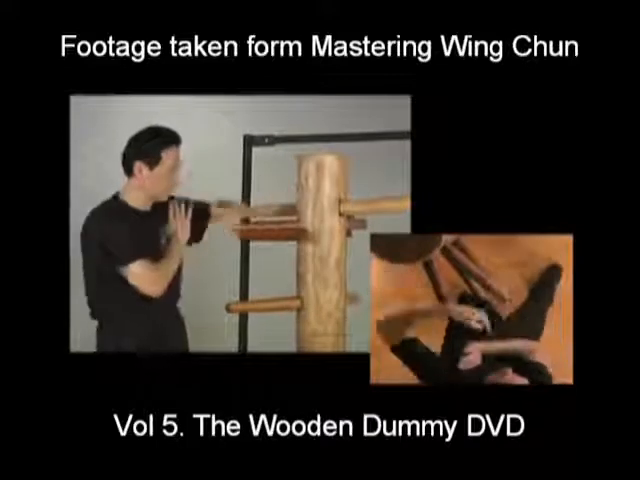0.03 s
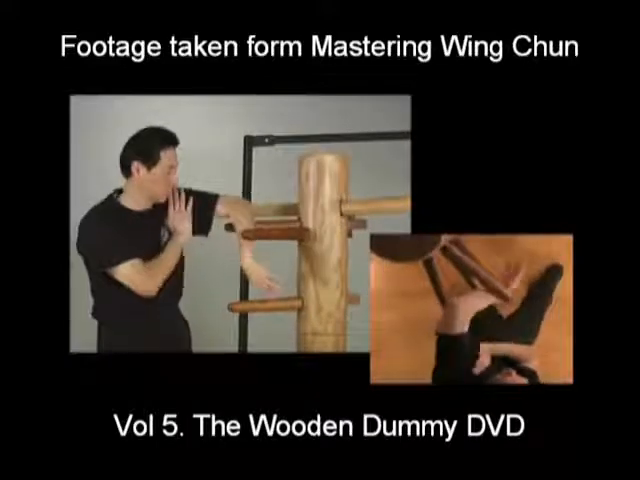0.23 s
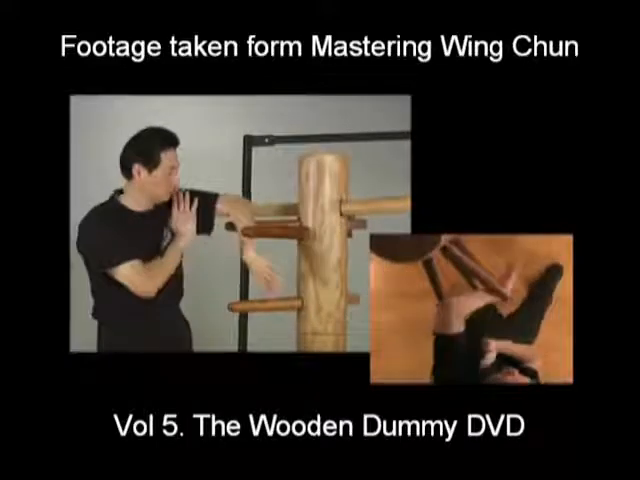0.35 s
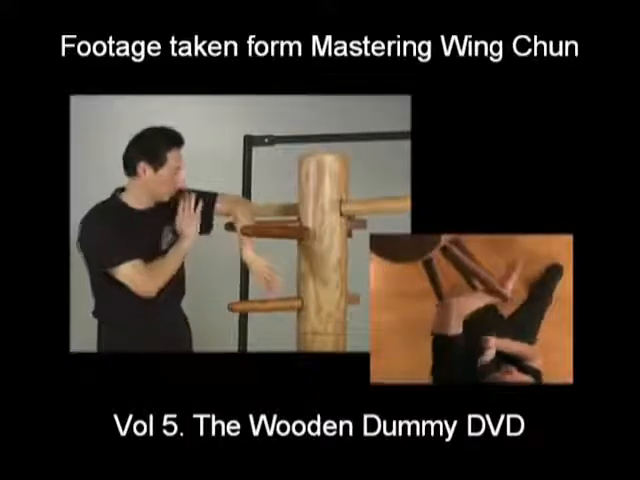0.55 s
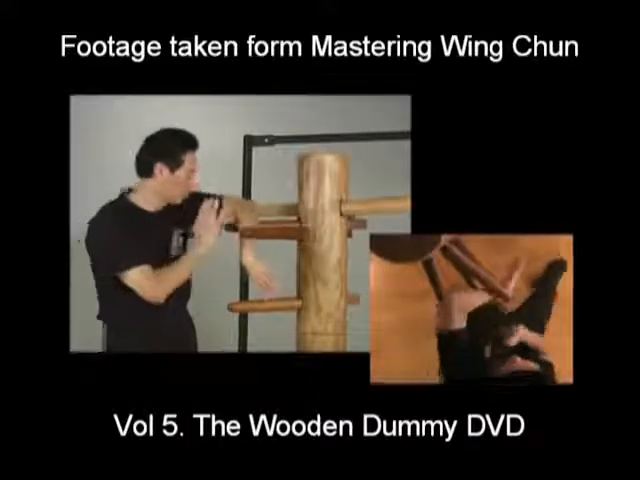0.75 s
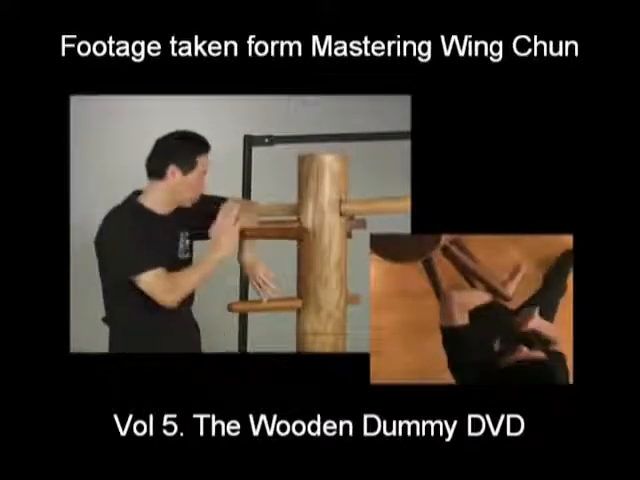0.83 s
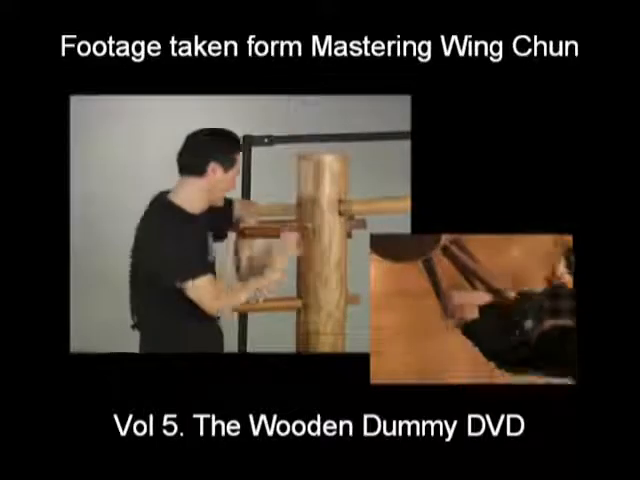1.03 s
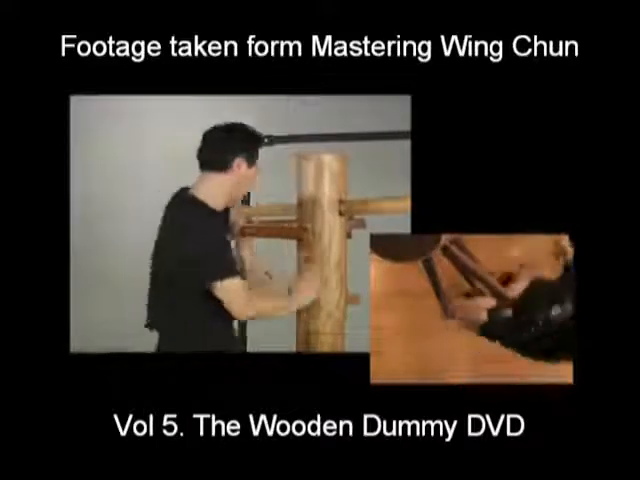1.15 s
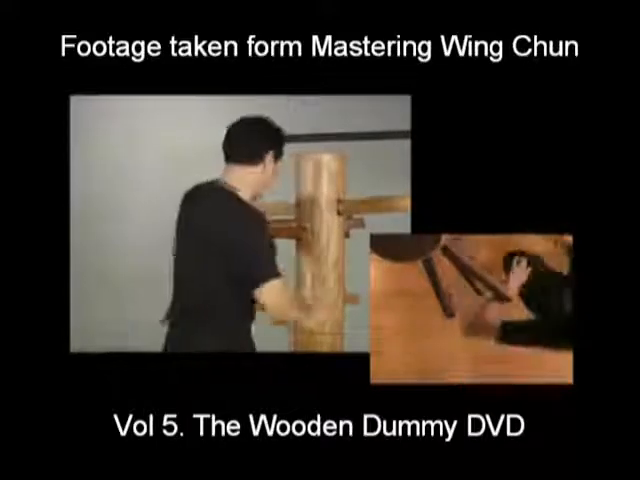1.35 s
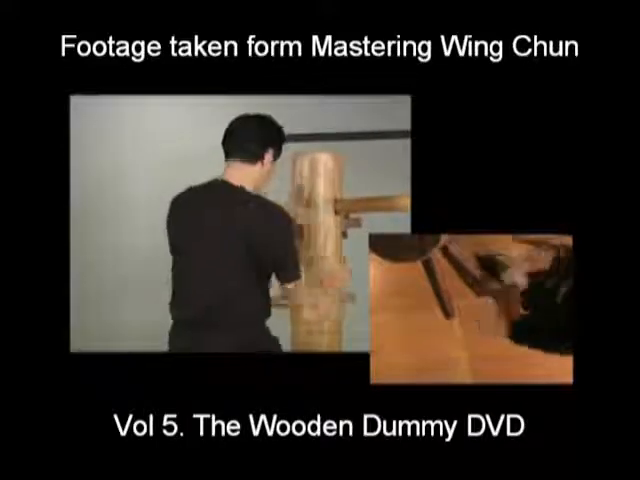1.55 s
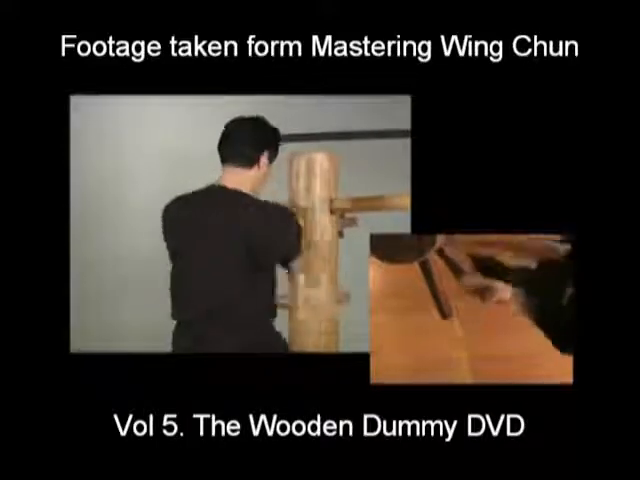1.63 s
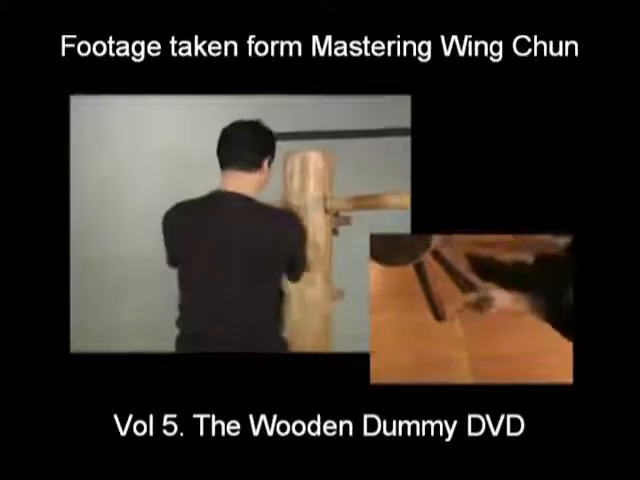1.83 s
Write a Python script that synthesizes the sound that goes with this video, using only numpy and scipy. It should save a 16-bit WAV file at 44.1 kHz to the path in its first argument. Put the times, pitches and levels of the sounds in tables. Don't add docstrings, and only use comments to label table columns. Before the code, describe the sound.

Forearms strike a wooden training dummy: one loud clattering knock early, a lull with a light slap, cloth brush and shoe squeaks, then a denser burst of knocks and thuds, close in a bare, echoing room with hiss.

```python
import sys
import numpy as np
from scipy import signal
from scipy.fft import rfft, irfft, next_fast_len
from scipy.io import wavfile
from scipy.ndimage import uniform_filter1d

SR = 44100
rng = np.random.default_rng(int(sys.argv[2]) if len(sys.argv) > 2 else 0)


def magnitude_from_level(level_db):
    exponent = np.asarray(level_db, float) / 20
    return 10 ** exponent


def wrap_up_sound(samples):
    columns = np.atleast_2d(samples).T
    tamed = np.clip(columns, -1, 1)
    steps = np.round(tamed * 32767).astype(np.int16)
    wavfile.write(sys.argv[1], SR, steps)


N = 83790
ARM_LOW_HZ, ARM_CRACK_T60_S = 450, .035
PALM_T60_S = .088


def unit(x):
    return x / np.sqrt(np.mean(x ** 2) + 1e-20)


def along(points, hz):
    f, value = np.transpose(points)
    return np.interp(np.log(hz + 1), np.log(f + 1), value)


def filtered(x, response):
    size = next_fast_len(x.shape[-1] + SR // 2)
    spectrum = rfft(x, size) * response(np.fft.rfftfreq(size, 1 / SR))
    return irfft(spectrum, size)[..., :x.shape[-1]]


def highpass(x, hz):
    return signal.sosfilt(signal.butter(4, hz, "high", fs=SR, output="sos"), x)


def add(track, s, sound):
    part = track[round(s * SR):][:len(sound)]
    part += sound[:len(part)]


def puff(spectrum, t60):
    t = np.arange(SR // 8) / SR
    noise = filtered(rng.standard_normal(len(t)), lambda hz: magnitude_from_level(along(spectrum, hz)))
    return unit(noise) * magnitude_from_level(-60 * t / t60)


# f/Hz, level/dB
CRACK_SPECTRUM = [(150, -120), (300, 12), (1500, 11.5), (3000, -4), (6000, -17), (12000, -38), (20000, -37)]


def knocks(blows, modes, low_hz, crack_t60, sag=0, loose=False):
    out, t = np.zeros(N), np.arange(SR // 2) / SR
    hz, mode_db, t60 = np.transpose(modes)[..., None]
    next_times = [blow[0] for blow in blows[1:]] + [np.inf]
    sag_s = .005
    choke_s, choke_left, free_t60_s = .006, .12, .2
    for (s, db, rise_ms, crack_db), then in zip(blows, next_times):
        bent_time = t + sag * min(magnitude_from_level(db), 1) * sag_s * (1 - np.exp(-t / sag_s))
        rings = magnitude_from_level(mode_db - 60 * t / t60) * np.sin(2 * np.pi * hz * bent_time)
        if loose:
            choke = ((then - s - t) / choke_s).clip(choke_left, 1)
            rings = rings * np.where(t60 < free_t60_s, choke, 1)
        strengths = magnitude_from_level(db + rng.normal(0, 2, len(modes)))
        add(out, s, -strengths @ rings * (1 - np.exp(-t * 1000 / rise_ms)))
        crack = puff(CRACK_SPECTRUM, crack_t60)
        crack_rise_ms = 0.17 * rise_ms
        add(out, s, magnitude_from_level(crack_db) * crack * (1 - np.exp(-t[:len(crack)] * 1000 / crack_rise_ms)))
    return highpass(out, low_hz)


# t/s, blow level/dB, rise/ms, crack level/dB
UPPER_BLOWS = [(.2068, 2.5, 4, -14), (.2365, -11, 4, -34), (.253, -6, 5, -40), (.278, -18, 1, -28),
               (.284, -8, 3, -30), (.294, -8.5, 3, -19), (.303, -8.5, 1.8, -33), (.319, -9, 6, -34),
               (.342, -24, 6, -20), (.352, -32, 2, -22), (.74, -46.5, 19, -59)]
# f/Hz, level/dB, t60/s
UPPER_MODES = [(540, -16.5, 0.071), (562.6, -11.5, 0.067), (661, -10, 0.12), (664, 3, 0.15),
               (818, -15.5, 0.14), (964, -19, .08), (1090, -15, 0.18), (1364, -18.5, 0.13),
               (1676, -22, 0.16), (1903, -19.5, 0.17), (2235, -24.5, 0.17), (2784, -20.5, 0.064),
               (2960, -32, 0.12)]


def upper_arm():
    return knocks(UPPER_BLOWS, UPPER_MODES, ARM_LOW_HZ, ARM_CRACK_T60_S, sag=.12, loose=True)


# t/s, blow level/dB, rise/ms, crack level/dB
LOWER_BLOWS = [
    (1.5346, -0.5, 1.5, -15),
    (1.558, -11, 26, -58),
    (1.581, -6.5, 3.1, -24),
    (1.592, -17.5, 1.8, -28),
    (1.615, -31.5, 2.6, -24),
    (1.65, -26.5, 3.5, -31),
    (1.812, -36, 1.4, -37),
    (1.87, -41.5, 5, -80),
]
# f/Hz, level/dB, t60/s
LOWER_MODES = [(577, -11, 0.12), (649.3, -1.5, 0.19), (643, -6, 0.1), (796, -4.5, 0.07), (925, -20, 0.098),
               (1096.4, -1.5, 0.084), (1277, -15, 0.079), (1473, -28, 0.015), (1731, -9, 0.039),
               (1842, -12, 0.18), (1943, -17, 0.19), (2444, -19, 0.067), (2847, -27, 0.093)]


def lower_arm():
    return knocks(LOWER_BLOWS, LOWER_MODES, ARM_LOW_HZ, ARM_CRACK_T60_S, loose=True)


# t/s, blow level/dB, rise/ms, crack level/dB
THIRD_BLOWS = [
    (1.5115, -5, 1.5, -27),
    (1.5195, -4, 1.2, -21),
    (1.531, -14, 1, -24),
]
# f/Hz, level/dB, t60/s
THIRD_MODES = [(590, -12, .06), (662, 0, .15), (950, -4, .1), (1310, -15, .05), (1385, -14, .06),
               (1657, -10, .08), (2300, -20, .05)]


def third_arm():
    return knocks(THIRD_BLOWS, THIRD_MODES, ARM_LOW_HZ, ARM_CRACK_T60_S, loose=True)


# t/s, blow level/dB, rise/ms, crack level/dB
PEG_BLOWS = [
    (1.0235, -26.5, 0.5, -62),
]
# f/Hz, level/dB, t60/s
PEG_MODES = [(691, -1, .03), (950, -3, .03), (1252, -1.5, 0.031)]


def peg():
    return knocks(PEG_BLOWS, PEG_MODES, ARM_LOW_HZ, ARM_CRACK_T60_S)


# t/s, blow level/dB, rise/ms, crack level/dB
HARD_BLOWS = [
    (.2068, -8, 30, -80),
    (1.5346, -20, 25, -80),
]
# f/Hz, level/dB, t60/s
LONG_MODES = [(623, 0, .48), (655, -12, .4)]


def trunk_ring():
    return knocks(HARD_BLOWS, LONG_MODES, ARM_LOW_HZ, ARM_CRACK_T60_S)


def flutter(x):
    out = x.copy()
    bounce_s, loss_db = .0225, 8.5
    for bounce in range(1, 8):
        add(out, bounce * bounce_s, magnitude_from_level(-loss_db * bounce) * x)
    return out


# t/s, blow level/dB, rise/ms, crack level/dB
THUD_BLOWS = [
    (.211, -26.5, 0.88, -69),
    (.29, -24.5, 3.4, -49),
    (1.0092, -28.5, .5, -41),
    (1.028, -35.5, 2.7, -38),
    (1.472, -19, 1.4, -53.5),
    (1.480, -28.5, 1.7, -35),
    (1.58, -18.5, 4.9, -26),
]
# f/Hz, level/dB, t60/s
TRUNK_MODES = [(203, -7.5, 0.18), (218, -7.5, 0.055), (242.3, 5, 0.045), (325, 1, 0.077),
               (402.2, -7.5, 0.19), (471.4, -10.5, 0.12), (510, -16.5, 0.044)]


def trunk_thuds():
    return flutter(knocks(THUD_BLOWS, TRUNK_MODES, 120, PALM_T60_S))


# t/s, blow level/dB, rise/ms, crack level/dB
ROCK_BLOWS = [
    (.21, -32, 1, -15),
    (.33, -36, 8.8, -77.5),
    (1.04, -57, 12, -82),
    (1.5, -34, 12, -72),
    (1.58, -29, 12, -66),
    (1.66, -33.5, 4.4, -73),
    (1.78, -41.5, 5.4, -76),
]
# f/Hz, level/dB, t60/s
FRAME_MODES = [(38, -19.5, 0.25), (70, -15, 0.24), (99, -1, 0.1), (111, -3.5, 0.12), (189, -12, 0.17)]


def frame_rocking():
    return knocks(ROCK_BLOWS, FRAME_MODES, 25, PALM_T60_S)


# f/Hz, level/dB
SNAP_SPECTRUM = [(1500, -50), (3500, -1.5), (6000, 7), (12000, -7.5), (20000, -18)]
# t/s, snap level/dB, steel f/Hz, ring level/dB
TICKS = [
    (0.21, -25, 7100, -54),
    (0.351, -68.5, 4160, -68),
    (1.472, -38.5, 4960, -46),
    (1.487, -40, 7480, -57.5),
    (1.536, -26.5, 9100, -48),
    (1.5415, -32, 6540, -62),
    (1.5433, -34, 3770, -56),
    (1.6133, -30.5, 5495, -48.5),
    (1.619, -28, 9130, -51),
    (1.692, -52.5, 9000, -55),
]


def ticks():
    out, t = np.zeros(N), np.arange(SR // 4) / SR
    for s, db, hz, ring_db in TICKS:
        wander = .8 * unit(uniform_filter1d(rng.standard_normal(len(t)), size=300))
        add(out, s, magnitude_from_level(db) * puff(SNAP_SPECTRUM, .008))
        add(out, s, magnitude_from_level(ring_db - 60 * t / .14) * np.sin(2 * np.pi * hz * t + wander))
    return out


def rubs(strokes, spectrum):
    t, out = np.arange(N) / SR, np.zeros(N)
    for s, rise, t60, db, tilt_db in strokes:
        grain_db = 2.2 * unit(uniform_filter1d(rng.standard_normal(N), size=130))
        grit = rng.standard_normal(N) * magnitude_from_level(grain_db)
        noise = unit(filtered(
            grit, lambda hz: magnitude_from_level(along(spectrum, hz) + tilt_db * np.log2(hz / 1000 + .01))))
        swell = ((t - s) / rise).clip(0, 1) ** 2
        out += noise * swell * magnitude_from_level(db - 60 * (t - s - rise).clip(0) / t60)
    return out


# t/s, rise/s, t60/s, level/dB, tilt/(dB per octave)
SCUFFS = [
    (-.1, 0.072, 0.82, -66.5, 6),
    (1.12, 0.13, 0.22, -45, 2.5),
    (1.471, 0.0047, 1, -33, 2),
    (1.599, 0.0058, 0.23, -23, 1.5),
]
# t/s, rise/s, t60/s, level/dB, tilt/(dB per octave)
MORE_SCUFFS = [
    (1.235, .04, .2, -63, 5),
]
# f/Hz, level/(dB per Hz)
SCUFF_SPECTRUM = [(59, -80), (100, -54), (173, -14), (327, -17), (468, -10.5), (598, -8.5), (2960, -35.5),
                  (9000, -57), (11700, -82), (19800, -120)]


def shoe_scuffs():
    return rubs(SCUFFS, SCUFF_SPECTRUM) + rubs(MORE_SCUFFS, SCUFF_SPECTRUM)


# t/s, rise/s, t60/s, level/dB, tilt/(dB per octave)
BRUSHES = [
    (.904, 0.005, 0.22, -52, 3),
    (.79, 0.022, 0.13, -72, 0),
    (1.01, 0.017, 0.13, -40, 0),
]
# f/Hz, level/(dB per Hz)
BRUSH_SPECTRUM = [(88, -45), (150, -6), (235, 0), (927, -7), (1430, -5.5), (3090, -25), (6000, -49),
                  (7800, -55), (13200, -120)]


def sleeve_brushes():
    return rubs(BRUSHES, BRUSH_SPECTRUM)


# t/s, length/s, f/Hz, level/dB
SQUEAKS = [
    (1.2, 0.012, 1620, -58),
    (1.228, 0.0069, 1660, -55),
    (1.248, 0.0045, 2960, -53),
    (1.252, 0.0035, 4460, -55.5),
    (1.243, 0.023, 469, -43),
    (1.305, 0.016, 950, -55.5),
    (1.31, .012, 1745, -59),
]


def shoe_squeaks():
    t, out = np.arange(N) / SR, np.zeros(N)
    for s, span, hz, db in SQUEAKS:
        out += magnitude_from_level(db) * np.exp(-.5 * ((t - s) / span) ** 2) * np.sin(2 * np.pi * hz * t)
    return out


# f/Hz, t60/s
ROOM_T60 = [(60, 0.39), (200, 0.73), (620, 0.51), (2000, 0.46), (6000, 0.27), (12000, 0.33)]
# f/Hz, level/dB
ROOM_COLOUR = [(50, -3), (200, 2.5), (480, 1.5), (680, -11.5), (950, 0), (2000, -2.5), (6000, 6),
               (14000, 7.5)]


def room(x):
    wet, step = np.zeros(N), round(.04 * SR)
    gap_s = 0.0098
    for start in range(0, N - step, step):
        hz, t, z = signal.stft(rng.standard_normal(SR * 2 // 3), SR, nperseg=256)
        decay = magnitude_from_level(-60 * t / along(ROOM_T60, hz)[:, None])
        tail = signal.istft(z * decay, SR, nperseg=256)[1]
        tail = tail * (1 - np.exp(-np.arange(len(tail)) / SR / gap_s))
        piece = x[start:start + 2 * step] * np.hanning(2 * step)[:N - start]
        add(wet, start / SR, signal.fftconvolve(piece, tail / np.linalg.norm(tail)))
    return filtered(wet, lambda hz: magnitude_from_level(-7 + along(ROOM_COLOUR, hz)))


# f/Hz, level/(dB per Hz)
HISS_SPECTRUM = [(15, -49.5), (25, -17.5), (152, -3), (289, -10), (632, -19), (762, -16), (3730, -25),
                 (7710, -20), (15500, -18)]
# f/Hz, correlation (1 = identical)
LIKENESS = [(60, 0.53), (180, 0.72), (550, 0.95), (1650, 0.58), (4970, 0.12), (15000, 0.054)]


def hiss():
    def mid_side(hz):
        turn = np.arccos(np.clip(along(LIKENESS, hz), -1, 1)) / 2
        return magnitude_from_level(along(HISS_SPECTRUM, hz)) * [np.cos(turn), np.sin(turn)]

    mid, side = filtered(rng.standard_normal((2, N)), mid_side)
    return magnitude_from_level(-61) * np.array([mid + side, mid - side]) / np.std(mid)


def scene():
    arms = upper_arm() + lower_arm() + third_arm() + peg()
    body = trunk_thuds() + frame_rocking() + ticks()
    dry = arms + body + shoe_scuffs() + sleeve_brushes()
    heard = dry + room(dry) + shoe_squeaks() + trunk_ring()
    balance_db = 0.08
    return heard * magnitude_from_level([[balance_db], [-balance_db]]) + hiss()


def low_pass(x):
    return signal.sosfilt(signal.butter(12, 15680, fs=SR, output="sos"), x)


def record(dry):
    bent = dry - 0.069 * dry ** 2 * np.abs(dry).clip(0, 1) ** 2
    clip_top, hardness = 1.03, 16
    clipped = bent / (1 + np.abs(bent / clip_top) ** hardness) ** (1 / hardness)
    mix = filtered(clipped, lambda hz: hz < 15680)
    return low_pass(mix)


dry = scene()
out = record(dry)
wrap_up_sound(out)
```